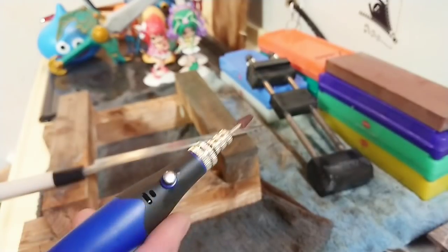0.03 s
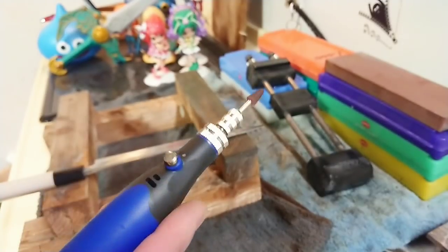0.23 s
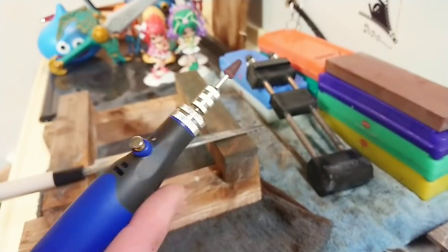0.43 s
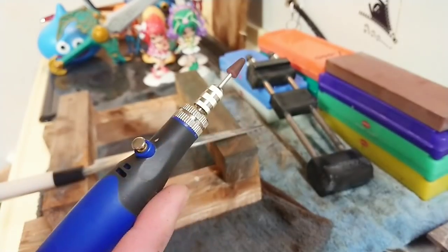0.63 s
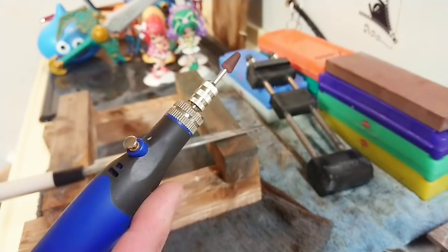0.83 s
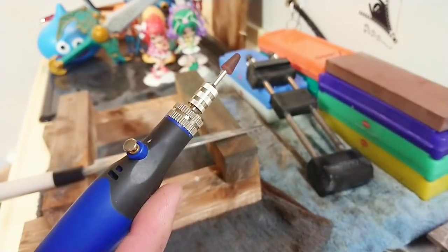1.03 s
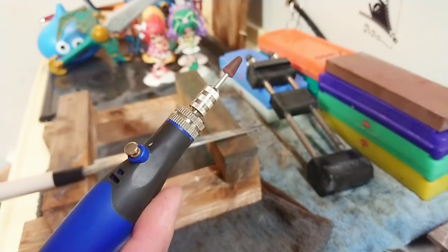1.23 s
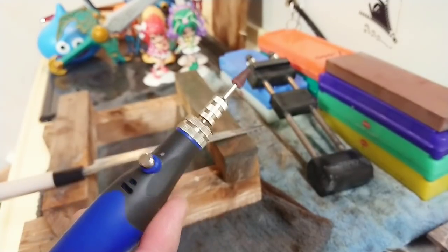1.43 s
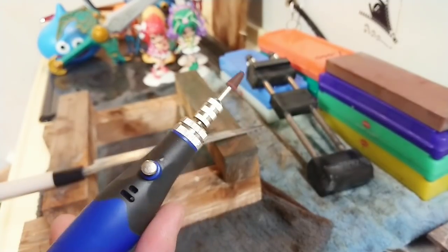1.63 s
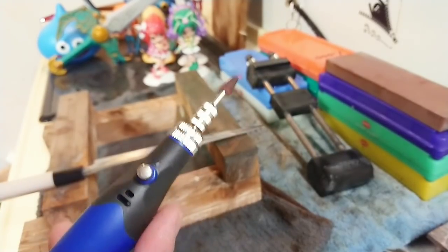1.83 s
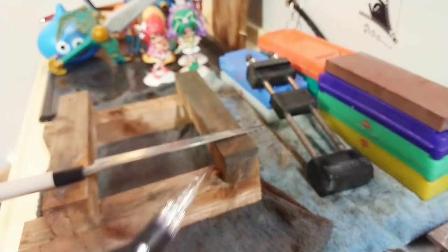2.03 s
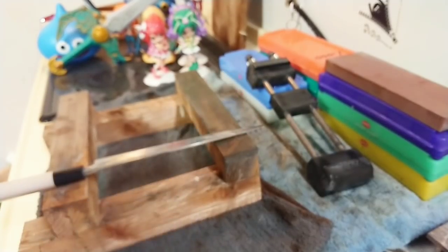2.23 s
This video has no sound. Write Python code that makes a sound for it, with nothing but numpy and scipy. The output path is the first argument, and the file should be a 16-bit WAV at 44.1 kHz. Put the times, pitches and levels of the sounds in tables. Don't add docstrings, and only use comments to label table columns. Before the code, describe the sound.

A small cordless rotary tool clicks on sharply, spins up almost instantly to a steady raspy whine, slows from mid-way, then snaps off loudly and fades with faint ticks; close stereo microphone, louder left, quiet small workshop.

```python
import sys
import numpy as np
from scipy import signal
from scipy.fft import rfft, irfft, next_fast_len
from scipy.io import wavfile
from scipy.ndimage import uniform_filter1d, map_coordinates

SR = 44100
rng = np.random.default_rng(int(sys.argv[2]) if len(sys.argv) > 2 else 0)


def ratio(d):
    e = np.asarray(d, float) / 20
    return 10 ** e


def output_pcm(signal):
    pcm = np.clip(np.atleast_2d(signal).T, -1, 1) * 32767
    wavfile.write(sys.argv[1], SR, np.round(pcm).astype(np.int16))


N = 101429
T = np.arange(N) / SR

# frequency in Hz, level in dB per Hz.
AIR_SPECTRUM = [(59, -66.5), (100, -1.5), (240, -10), (313, -2.5), (625, -4), (1150, -10.5), (1360, -13.5),
                (11000, -18), (12500, -40.5)]
# time in seconds, level in dB.
AIR_SETTLE = [(0, -3.5), (.1, -5.5), (.13, -1), (2.3, 2.5)]
# time in seconds, level in dB.
RUMBLE_LEVEL = [(0.0, -100), (0.04, -84), (0.22, -71), (0.76, -82.5), (0.8, -74), (1.28, -74.5),
                (1.34, -73), (1.5, -68), (1.53, -79.5), (2.09, -75), (2.3, -80)]
# start in seconds, frequency in Hz, level in dB.
TICKS = [(.1135, 5200, -43.5), (.114, 3000, -47.5), (.224, 89.3, -59.5), (.226, 220, -60),
         (.2265, 480, -57), (.227, 1720, -44.5), (.227, 914, -49), (.14, 3200, -50), (.155, 2850, -59),
         (1.652, 180, -58.5), (1.652, 582.4, -51.5), (1.879, 13250, -26), (1.8792, 9200, -30),
         (1.884, 3580, -39), (1.884, 438.6, -45.5), (1.896, 591, -45.5), (1.895, 295, -49.5)]
# time in seconds, level in dB.
RUB_LEVEL = [(0, -110), (.11, -100), (.125, -68.5), (.22, -71.5), (.3, -110)]
# time in seconds, frequency in Hz, level in dB.
BEARING_SQUEAK = [(2.1, 8050, -130), (2.12, 8020, -69), (2.2, 7500, -72), (2.24, 7400, -130)]
# time in seconds, frequency in Hz, level in dB.
GRIP_HUM = [(1.45, 270, -95), (1.55, 280, -68), (1.66, 290, -65), (1.7, 290, -95)]
# time in seconds, level in dB, burst length in seconds.
SNAPS = [
    (0.2278, -11, 0.001276),
    (1.6529, -0.5, 0.0009),
]
# frequency in Hz, width in Hz, level in dB.
SWITCH_MODES = [
    [(1190, 900, -29.5), (3200, 930, -9.5), (4432, 261, 0), (4910, 378, 3.5), (6713, 1320, -2.5),
     (9364, 600, 1.5), (10960, 600, -2.5), (14365, 1200, -13)],
    [(1500, 1900, -26), (3230, 582, -5), (4922, 344, 4.5), (5930, 650, -4.5), (7310, 613, 4),
     (9270, 760, -20.5), (10277, 530, -13), (14760, 1400, -15)],
]
# time in seconds, level in dB.
HOUSING_LEVEL = [(.24, -49.5), (.27, -50), (.31, -46), (.4, -47), (.6, -46), (.96, -46), (1.31, -46),
                 (1.5, -44), (1.62, -49), (1.75, -50.5), (1.87, -53), (2.03, -56.5), (2.15, -56),
                 (2.3, -65)]
# frequency in Hz, width in Hz, level in dB.
HOUSING_MODES = [(1320, 272.7, -0.5), (1517, 248.4, 2), (1835.5, 534, 2), (2958, 393, 2.5),
                 (3042.6, 190.6, 2.5), (3532, 155, -1), (3768, 49.6, 0), (4055, 176, -4.5), (4651, 600, -5),
                 (5941, 1226, -3), (7199, 670, -3.5)]
# frequency in Hz, width in Hz.
SLOW_DIPS = [(1300, 150), (5300, 550)]
# frequency in Hz, level in dB per Hz.
VENT_SPECTRUM = [(6500, -19.5), (7800, 4.5), (9300, 6.5), (10500, 2), (12000, 1), (14400, 4.5),
                 (15700, -1.5)]
# frequency in Hz, width in Hz, level in dB.
COLLET_MODES = [(9040, 56, -2), (10500, 40, -6), (13265, 28, 2), (13900, 41, 2), (14185, 25, -4),
                (14386, 20, -6), (14800, 19, 0.5), (15000, 25, -5), (15260, 120, -7.5), (15600, 150, -11)]
# frequency in Hz, width in Hz, level in dB.
IDLE_MODES = [(400, 200, -14), (1800, 130, 2), (3300, 700, -4)]
LOWER_ORDERS = [(1, 0), (2, 0), (3, 1), (4, 0), (5, 0), (5, 1), (6, 2), (7, 2), (8, 0), (8, 2), (9, 1),
                (10, -1), (10, 1), (10, 2)]
LOWER_ORDER_DB = [-30, -33, -27, -21, -30, -28, -23, -21, -15, -14, -6, -20, -13, -15]
TURNING_DB_PER_S = [5.5, -4.5, -1, 12, 16, 5.5, 7, -6, 8, 14.5, 3.5, -12.5, 5.5, -0.5]
UPPER_ORDERS = [(15, 0), (15, 1), (15, 2), (16, 2), (16, 3), (18, 2), (18, 3), (19, -2), (19, -1), (21, -1),
                (21, 0), (25, 3)]
UPPER_ORDER_DB = [-16.5, -30, -16, -26, -16.5, -14, -12, -13, -24, -15, -24, -32]
BRUSH_BEATS = (0.056, 0.176, 0.076)
# delay in seconds, level in dB.
ECHOES = [(.0075, -10.5), (.0088, -16), (.012, -22), (.017, -23.5), (.028, -37.5)]
# frequency in Hz, t60 in seconds.
ROOM_T60 = [(300, 0.32), (3000, 0.197), (7000, 0.196), (12000, 0.11)]
# frequency in Hz, level in dB.
FAR_PORT = [(60, 2), (300, -26), (1400, -15), (4400, -27.5), (5800, -40.5), (7000, -19), (10000, -15.5),
            (15000, -17)]

AIR_DB, AIR_RIGHT_DB = -65.5, -10
RUMBLE_HZ, RUMBLE_WIDE_HZ = 59.4, 12.05
TICK_CYCLES = 2.8
CREEP_S, CREEP_DB, RING_T60_S = .0045, -7, .02
ON_S, SPIN_UP_S, TOP_HZ, DROOP_HZ_PER_S = .226, .045, 185.2, 1.4
COAST_S, SAG_HZ_PER_S, CRAWL_HZ = 1.32, 181, 14
CAGE = .1935
CAGE_DEPTH, CAGE_SPREAD_RAD, CAGE_SHIFT_TURNS = .4, 1.45, .02
JITTER_S = 1.5e-5
BRUSH_DB, VENT_BALLS = -3, .25
DIP_HZ, DIP_WIDE_HZ, DIP_DB = 2309, 505, -8
SLOW_DIP_DEPTH = 0.884
RASP_HZ, RASP_WIDE_HZ, RASP_DEPTH = 3150, 750, .45
VENT_DB, VENT_GROWS_DB = -4.5, 0.3685
COLLET_DB, IDLE_DB = -15, 1
ORDER_FADE, TURN_FROM_S, TURN_TO_S = .014, .6, 1.3
ROOM_DB, ECHO_TOP_HZ = -16, 7550
LAG_S, SCATTERED, SCATTER_TILT = 0.0002806, 1.72, 0.402
RIGHT_GAP_HZ, RIGHT_GAP_WIDE_HZ = 5850, 520
BAND_HZ, SNAP_TOP_HZ, SNAP_OPENS = 15750, 16800, .08


def unit(x):
    return x / np.sqrt(np.mean(x ** 2) + 1e-20)


def along(points, hz):
    f, v = np.transpose(points)
    return np.interp(np.log(hz + 1), np.log(f + 1), v)


def curves(rows):
    s, *cols = np.transpose(rows)
    return [np.interp(T, s, c) for c in cols]


def wobble(rate_hz):
    return map_coordinates(rng.standard_normal(int(N * rate_hz / SR) + 4), [T * rate_hz])


def filtered(x, response):
    m = next_fast_len(N + SR // 2)
    return irfft(rfft(x, m) * response(np.fft.rfftfreq(m, 1 / SR)), m)[..., :N]


def ringing(modes):
    def response(f):
        return sum((-1) ** k * ratio(db) * 1j * f * wide / (hz * hz - f * f + 1j * f * wide)
                   for k, (hz, wide, db) in enumerate(modes))
    return response


def bump(f, hz, wide_hz):
    return np.exp(-((f - hz) / wide_hz) ** 2)


def pulses(times_s, sizes):
    at = times_s[:, None] * SR
    idx = np.floor(at).astype(int) + np.arange(-7, 9)
    shape = np.sinc(idx - at) * np.cos(np.pi * (idx - at) / 16) ** 2
    return np.bincount(np.clip(idx, 0, N).ravel(), (shape * sizes[:, None]).ravel(), N + 1)[:N]


def gliding(rows):
    hz, db = curves(rows)
    return ratio(db + 0.89 * wobble(23.0)) * np.sin(2 * np.pi * np.cumsum(hz) / SR)


def air():
    hiss = unit(filtered(rng.standard_normal((2, N)), lambda f: ratio(along(AIR_SPECTRUM, f))))
    low = rng.standard_normal(N) + 0.67 * rng.standard_normal((2, N))
    low = unit(filtered(low, ringing([(RUMBLE_HZ, RUMBLE_WIDE_HZ, 0)])))
    hiss_level = ratio(AIR_DB + curves(AIR_SETTLE)[0])
    rumble_level = ratio(curves(RUMBLE_LEVEL)[0] + 5)
    return (hiss_level * hiss + rumble_level * low) * ratio([[0], [AIR_RIGHT_DB]])


def handling():
    ticks, t = np.zeros(N + SR), np.arange(2000) / SR
    for s, hz, db in TICKS:
        envelope = np.exp(-t * hz / TICK_CYCLES) * (1 - np.exp(-t * hz))
        ticks[round(s * SR):][:len(t)] += ratio(db) * np.sin(2 * np.pi * hz * t) * envelope
    grip = ringing([(3000, 370, 1), (9365, 4400, 0), (14400, 2000, -1.6)])
    rub = unit(filtered(rng.standard_normal(N), grip))
    rub = ratio(curves(RUB_LEVEL)[0] + 3.3 * wobble(63.4)) * rub
    return ticks[:N] + rub + gliding(BEARING_SQUEAK) + gliding(GRIP_HUM)


def switch():
    out = np.zeros(N)
    for (s, db, length_s), modes in zip(SNAPS, SWITCH_MODES):
        u = T - s
        creep = ratio(CREEP_DB) * np.clip(1 + u / CREEP_S, 0, 1) ** .5 * (u < 0)
        burst = np.exp(-(u / length_s) ** 2) + 0.21 * (u > 0) * ratio(-60 * np.abs(u) / RING_T60_S)
        contacts = unit(rng.standard_normal(N) * ratio(2.47 * rng.standard_normal(N)))
        out += ratio(db) * filtered((creep + burst) * contacts, ringing(modes))
    return out


def shaft_speed():
    spin_up = TOP_HZ * (1 - np.exp(-np.clip(T - ON_S, 0, None) / SPIN_UP_S))
    sag = SAG_HZ_PER_S * np.clip(T - COAST_S, 0, None)
    speed = spin_up - DROOP_HZ_PER_S * (T - ON_S) - sag
    return np.maximum(speed, CRAWL_HZ) * (1 + 0.001264 * wobble(4))


def ball_contacts(speed, turns, count=14):
    place, load = rng.random(count), rng.normal(0, 1, count)
    lead = rng.normal(0, CAGE_SPREAD_RAD, count)
    at = np.arange(int(turns[-1]))[:, None] + place
    cage_angle = 2 * np.pi * CAGE * at
    size = load * np.clip(1 + CAGE_DEPTH * np.cos(cage_angle + lead), 0, None) ** 2
    shifted = at + CAGE_SHIFT_TURNS * np.sin(cage_angle + 3 * lead)
    times_s = np.interp(shifted, turns, T) + JITTER_S * rng.standard_normal(at.shape)
    balls = unit(pulses(times_s.ravel(), size.ravel()) / np.sqrt(speed))
    return filtered(balls * (speed / TOP_HZ) ** 3.09, lambda f: (1j * f / (1j * f + 1500)) ** 2)


def brush_noise(turns):
    beat = sum(d * np.cos(2 * np.pi * k * turns) for d, k in zip(BRUSH_BEATS, (CAGE, 1, 2)))
    return ratio(BRUSH_DB) * (1 + beat) * rng.standard_normal((2, N))


def housing(drive, turns, fast):
    def shell(f):
        stiff = DIP_HZ ** 2 - f * f
        dip = (stiff + 1j * f * DIP_WIDE_HZ * ratio(DIP_DB)) / (stiff + 1j * f * DIP_WIDE_HZ)
        return ringing(HOUSING_MODES)(f) * dip * f * f / (f * f + 900 ** 2) / (1 + (f / 8200) ** 8)
    body = unit(filtered(drive, shell))
    slow_bands = filtered(body, lambda f: sum(bump(f, hz, wide) for hz, wide in SLOW_DIPS))
    body = body - SLOW_DIP_DEPTH * np.clip(1.5 - 2 * fast, 0, 1) * slow_bands
    rasp = filtered(body, lambda f: bump(f, RASP_HZ, RASP_WIDE_HZ))
    return body + RASP_DEPTH * np.cos(2 * np.pi * CAGE * turns) * rasp


def shaft_orders(turns, fast):
    out = np.zeros(N)
    hand_s = np.clip(T, TURN_FROM_S, TURN_TO_S) - 1
    slopes = np.pad(TURNING_DB_PER_S, (0, len(UPPER_ORDER_DB)))
    for (m, n), db, slope in zip(LOWER_ORDERS + UPPER_ORDERS, LOWER_ORDER_DB + UPPER_ORDER_DB, slopes):
        level = ratio(db + 1.62 * wobble(14.045) + slope * hand_s) * fast ** (ORDER_FADE * m ** 3)
        out += level * np.sin(2 * np.pi * ((m + n * CAGE) * turns + rng.random()))
    return out


def motor():
    speed = shaft_speed()
    turns, fast = np.cumsum(speed) / SR, speed / TOP_HZ
    balls, brush = ball_contacts(speed, turns), brush_noise(turns)
    drive = balls + brush[0]
    level_db, = curves(HOUSING_LEVEL)

    body = housing(drive, turns, fast) * np.clip(0.5 + fast, 0, 1)
    vents = unit(filtered(VENT_BALLS * balls + brush[1],
                          lambda f: ratio(along(VENT_SPECTRUM, f)) * (f > 6000)))
    vent_level = ratio(VENT_DB + VENT_GROWS_DB * (level_db - level_db.max()))
    vents = vent_level * np.clip(fast / 0.286, 0, 1) ** 3 * vents
    orders = shaft_orders(turns, fast) * np.clip(7 * fast - 4.8, 0, 1)
    collet = ratio(COLLET_DB) * fast ** 4 * unit(filtered(drive, ringing(COLLET_MODES)))
    idle = ratio(IDLE_DB) * (1 - fast) ** 2 * unit(filtered(drive, ringing(IDLE_MODES)))

    start = np.clip((T - ON_S) / 0.0127, 0, 1)
    return start * ratio(level_db + 6) * (body + vents + orders + collet + idle)


def workshop(x):
    hz, t, z = signal.stft(rng.standard_normal((2, SR // 2)), SR, nperseg=256)
    decay = ratio(-60 * t / along(ROOM_T60, hz)[:, None])
    tail = signal.istft(z * decay, SR, nperseg=256)[1]
    tail = tail / np.linalg.norm(tail[0])
    wet = signal.fftconvolve(np.pad(x, (250, 0))[None], tail, axes=1)[:, :N]
    echoes = sum(ratio(db) * np.roll(x, round(s * SR)) for s, db in ECHOES)
    return ratio(ROOM_DB) * wet + filtered(echoes, lambda f: 1 / (1 + 1j * f / ECHO_TOP_HZ) ** 2)


def scene():
    clicks = switch()
    near = motor() + handling() + clicks + workshop(clicks)
    smear = rng.standard_normal(3000) * np.exp(-np.arange(3000) / 800)
    scatter = signal.fftconvolve(near[1], smear / np.linalg.norm(smear))[:N]
    far = near[1] + SCATTERED * filtered(scatter, lambda f: (f / 3000) ** SCATTER_TILT)
    far = filtered(far, lambda f: ratio(along(FAR_PORT, f)) * np.exp(-2j * np.pi * f * LAG_S))
    left, right = np.array([near[0], far]) + air()
    right = filtered(right, lambda f: 1 - np.exp(-((f - RIGHT_GAP_HZ) / RIGHT_GAP_WIDE_HZ) ** 6))
    return np.array([left, right])


def band_limit(x):
    return signal.sosfilt(signal.butter(12, 16800, fs=SR, output="sos"), x)


def record(dry):
    low = filtered(dry, lambda f: f < BAND_HZ)
    snap = np.clip(uniform_filter1d(np.abs(dry[0]), size=200) / SNAP_OPENS, 0, 1) ** 2
    high = filtered(snap * (dry - low), lambda f: f < SNAP_TOP_HZ)
    return band_limit(low + high)


dry = scene()
out = record(dry)
output_pcm(out)
```